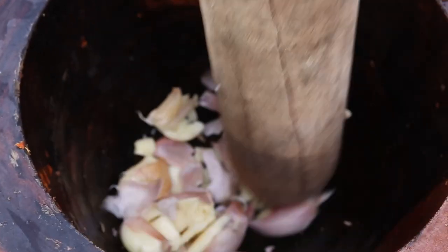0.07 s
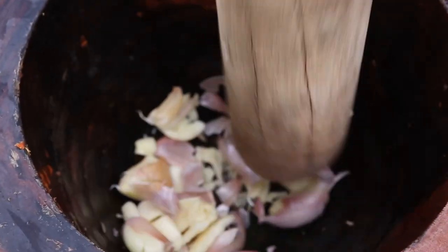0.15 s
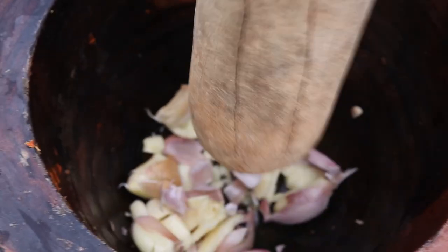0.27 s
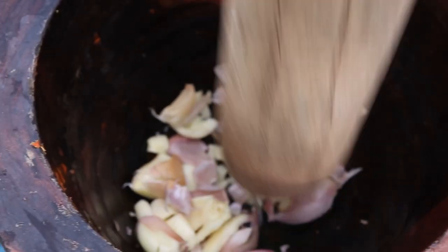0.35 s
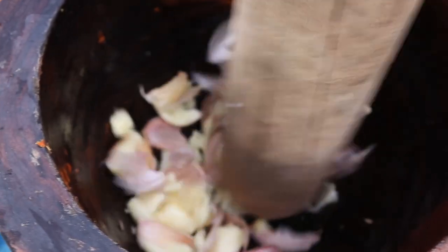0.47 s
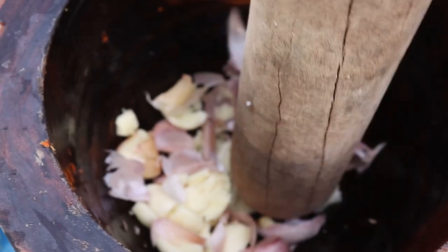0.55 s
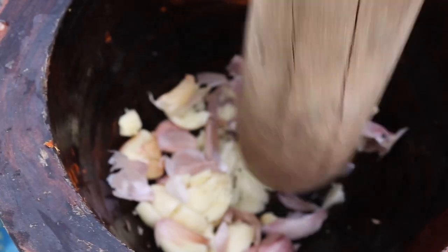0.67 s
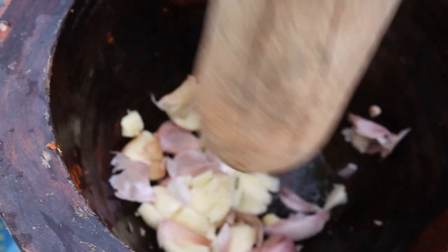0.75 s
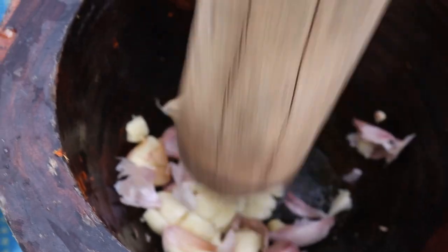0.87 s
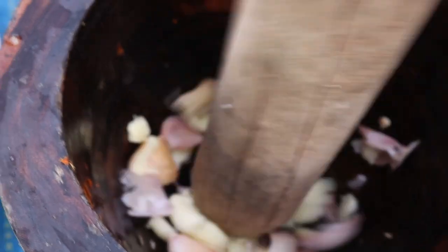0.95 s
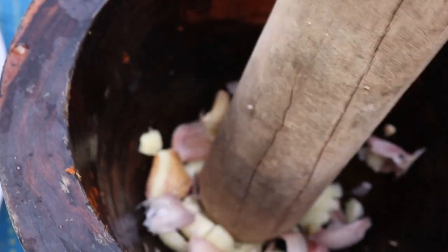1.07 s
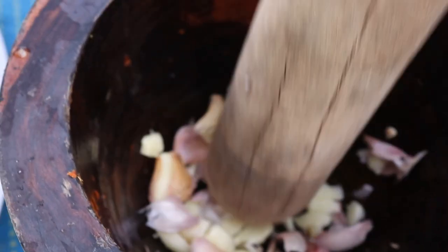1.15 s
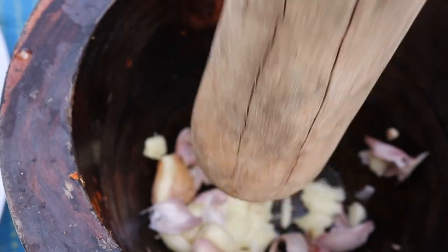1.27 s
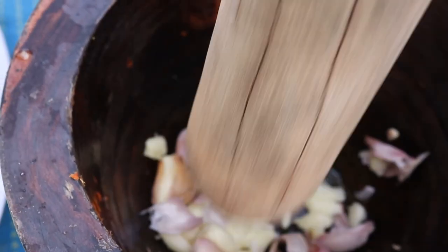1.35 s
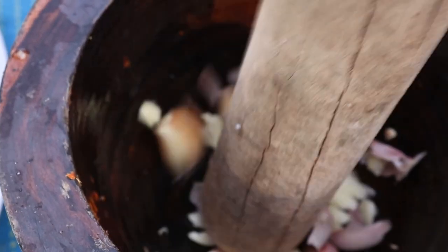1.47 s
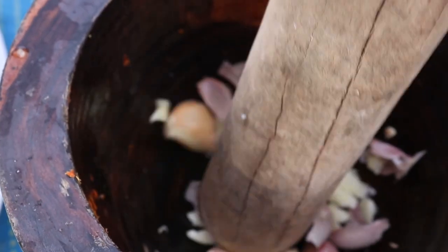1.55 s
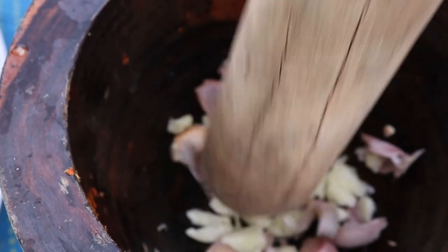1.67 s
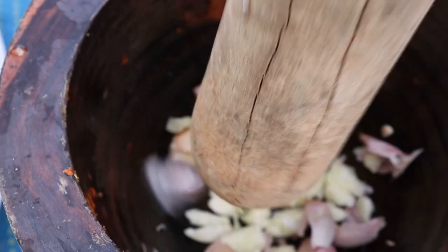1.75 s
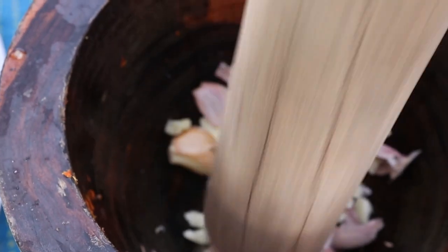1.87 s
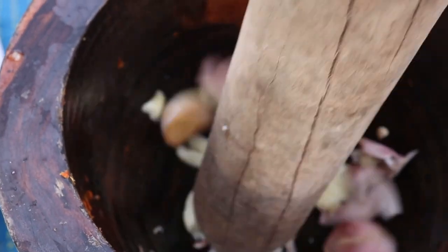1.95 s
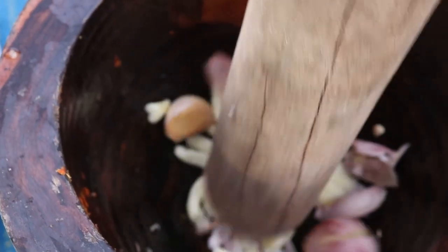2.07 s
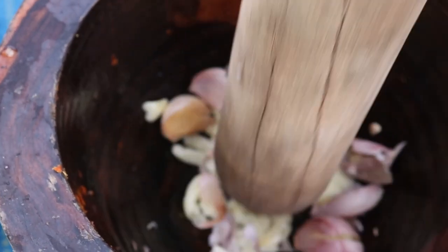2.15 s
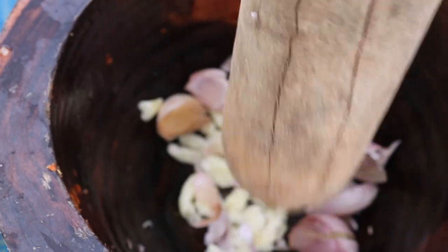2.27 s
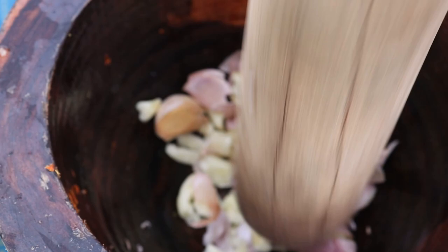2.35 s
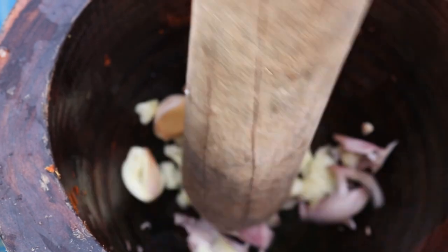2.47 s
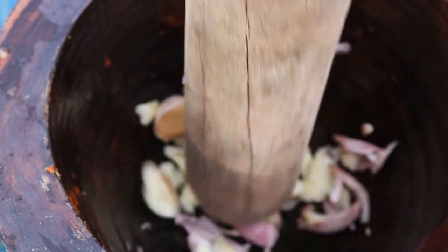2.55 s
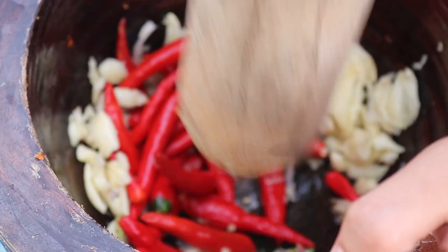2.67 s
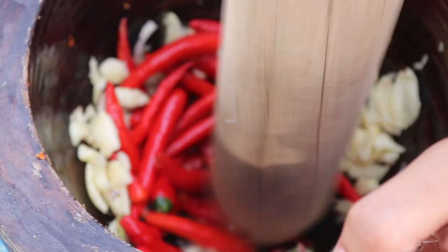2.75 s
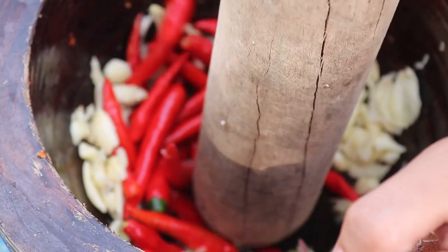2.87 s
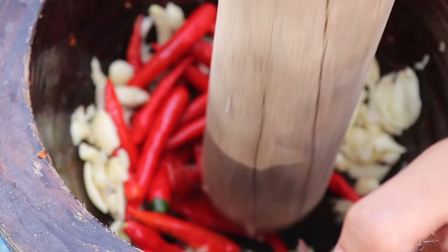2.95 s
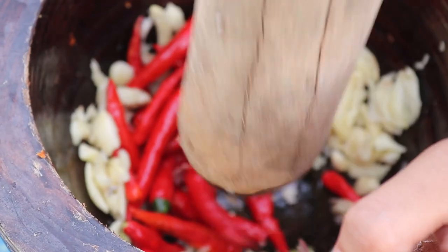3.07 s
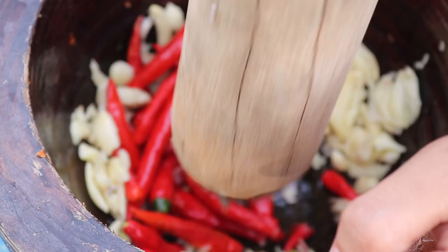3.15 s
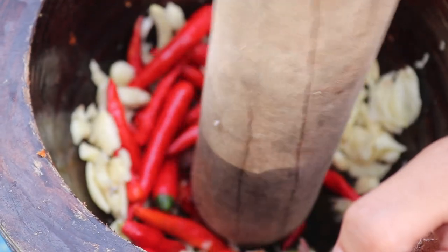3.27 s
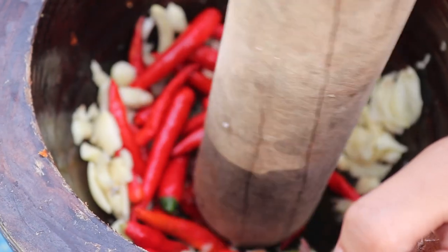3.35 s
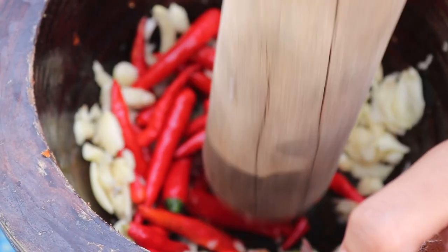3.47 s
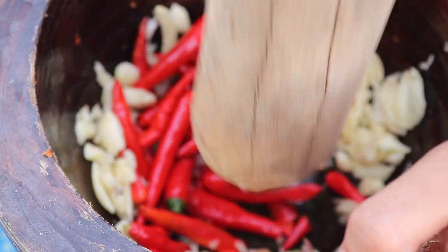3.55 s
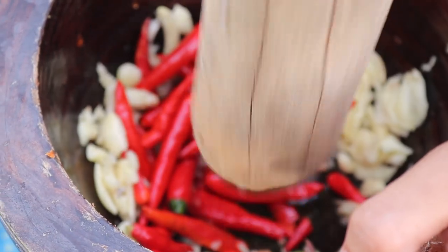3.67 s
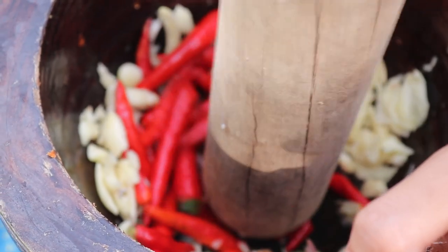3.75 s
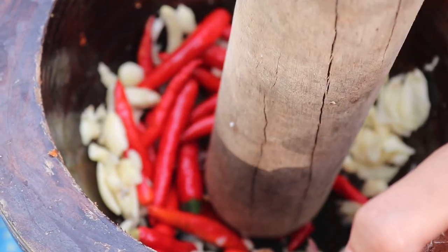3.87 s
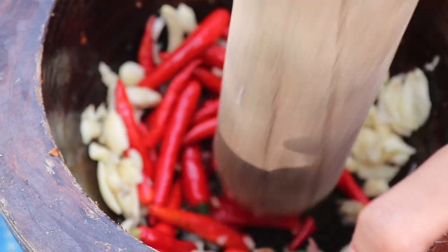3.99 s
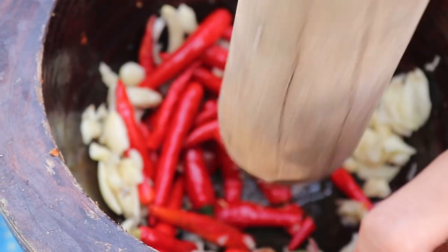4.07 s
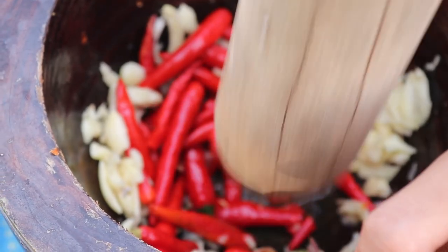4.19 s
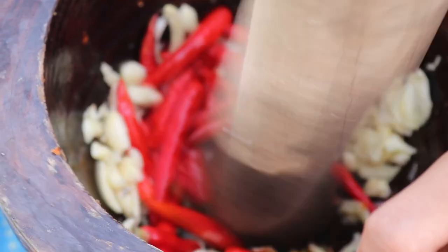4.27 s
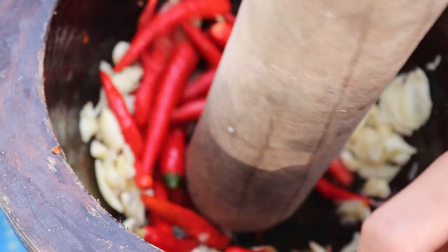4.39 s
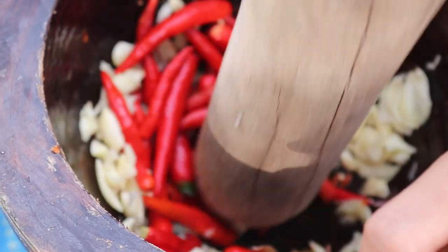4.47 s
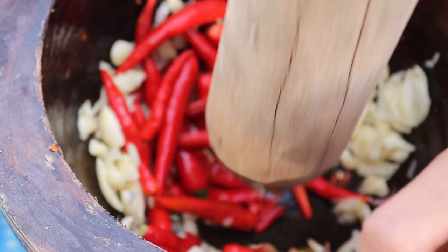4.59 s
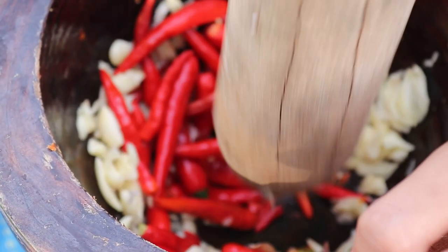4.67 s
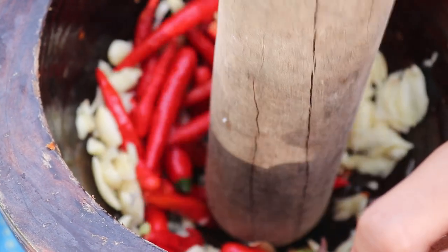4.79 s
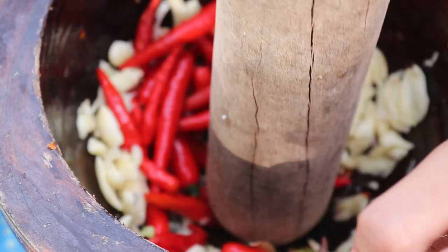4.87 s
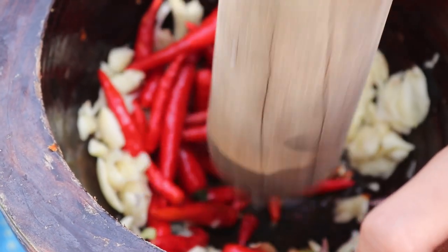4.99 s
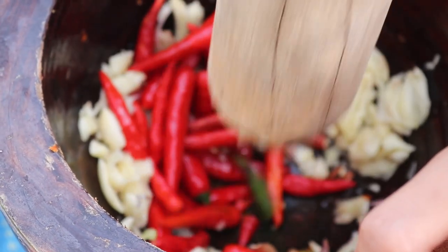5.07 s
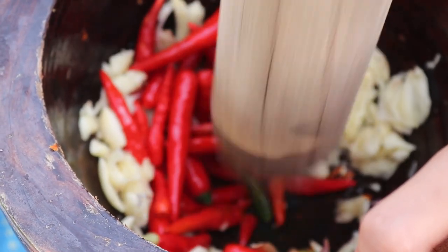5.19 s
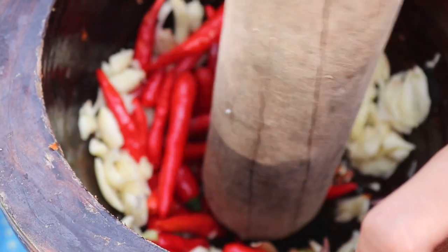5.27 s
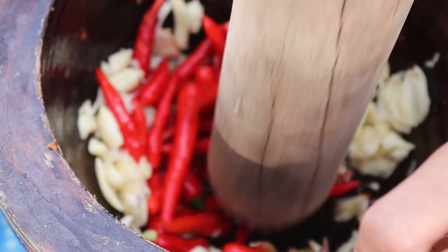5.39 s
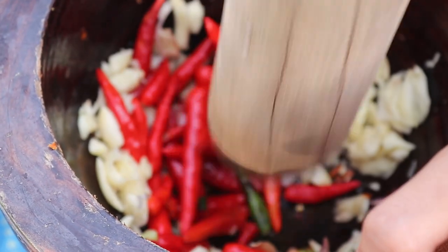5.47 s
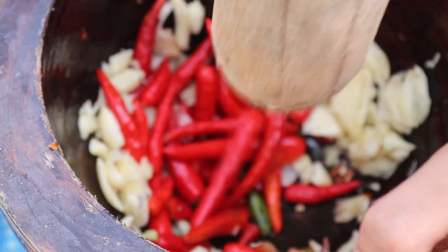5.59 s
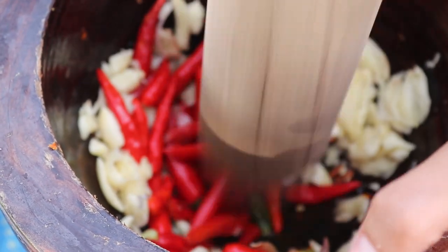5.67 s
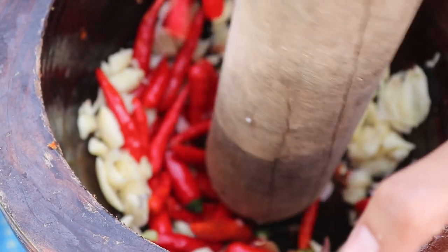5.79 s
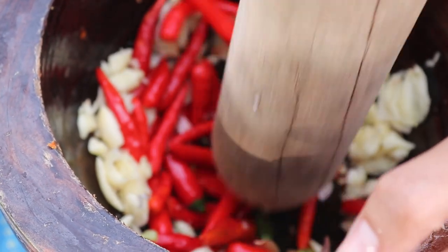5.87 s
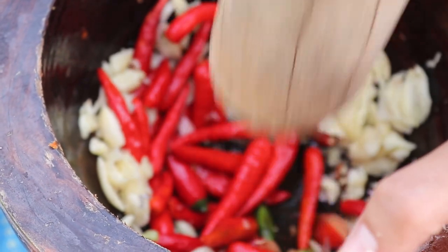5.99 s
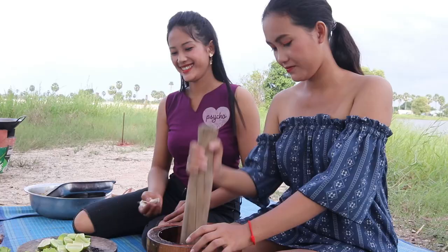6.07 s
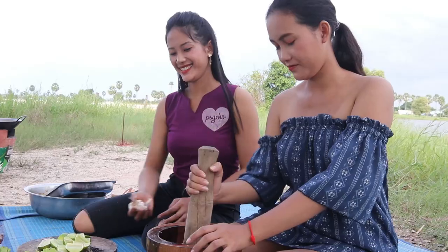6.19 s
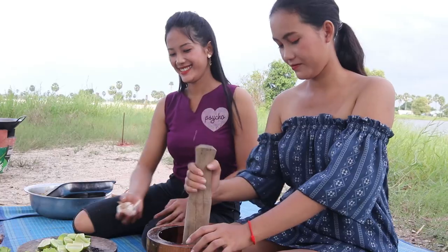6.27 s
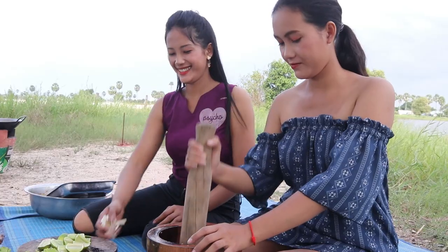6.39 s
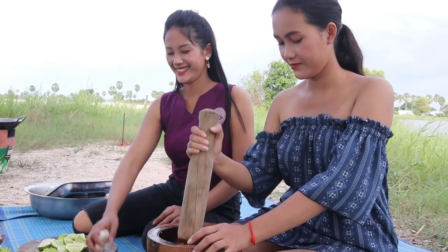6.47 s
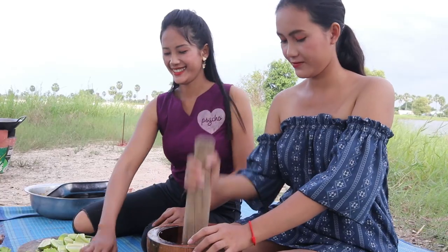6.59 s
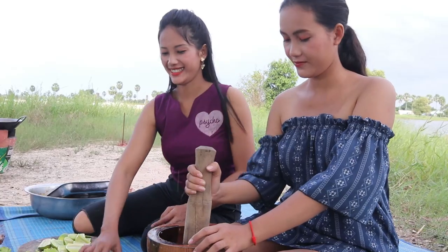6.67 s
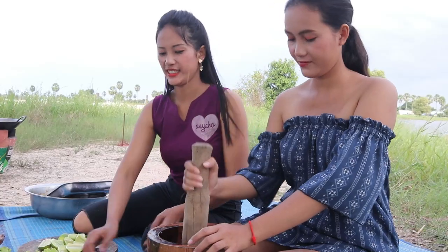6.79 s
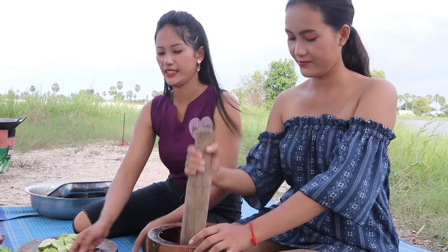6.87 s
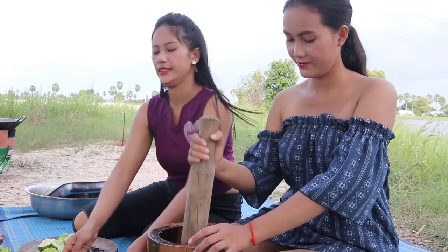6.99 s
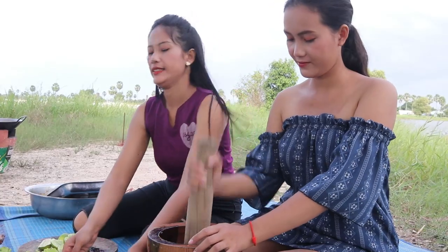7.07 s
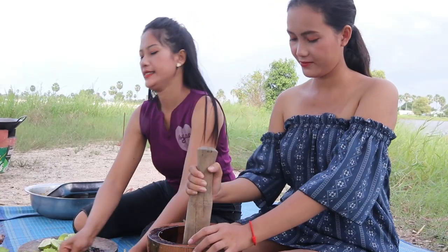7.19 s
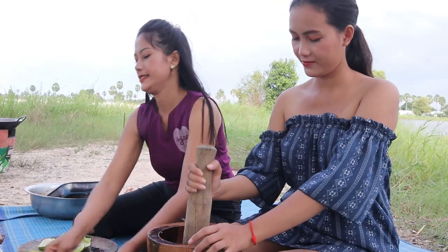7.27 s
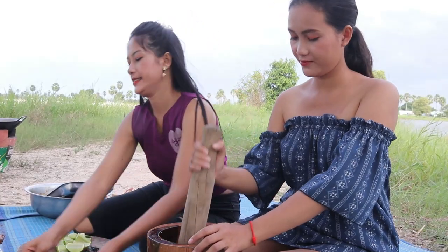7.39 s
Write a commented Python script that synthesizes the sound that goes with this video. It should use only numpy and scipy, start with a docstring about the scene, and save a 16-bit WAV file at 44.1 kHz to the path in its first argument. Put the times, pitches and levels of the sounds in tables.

```python
"""Outdoors, in hiss and wind that buffets the microphone, a wooden pestle pounds garlic in a wooden
mortar, two blows a second. Each blow crunches through the food and, where it gets through, knocks the
hollow bowl; the hardest knocks overload. Pulp fizzes, skins rustle and snap between blows, and a thin
squeak passes near 2 s. From 2.66 s the food is chillies and the hiss changes colour. It changes again
at 6.11 s, and the last three blows are further off."""
import sys
import numpy as np
from scipy import signal
from scipy.fft import rfft, irfft, next_fast_len
from scipy.io import wavfile

SR = 44100
rng = np.random.default_rng(int(sys.argv[2]) if len(sys.argv) > 2 else 0)


def waveform_to_disk(signal):
    """Save audio, clipped to [-1, 1], as 16-bit WAV at the path in sys.argv[1]."""
    frames = np.transpose(np.atleast_2d(signal))
    scaled = np.clip(frames, -1, 1) * 32767
    samples = np.round(scaled).astype(np.int16)
    wavfile.write(sys.argv[1], SR, samples)


N = 327677
TIME = np.arange(N) / SR
CHILLI_FROM_S, FAR_FROM_S = 2.66, 6.11

# food bursting under the pestle: (peak time [s], level [dB], sink-in [s], die-away [s],
# tilt [dB/octave], pocket resonance [Hz], its lift [dB], fizz afterwards [dB])
CRUNCHES = [ (0.211, -27, .006, .006, 5, 4230, 14, -48), (0.5076, -5, 0.0125, 0.0039, 5, 4730, 3.5, -22),
            (1.032, -15, .019, 0.014, 4.5, 2830, 6.5, -30.5),
            (1.534, -12, 0.019, 0.007, 5.5, 3400, 2, -23.5),
            (2.006, -10.5, 0.019, 0.0054, 3.5, 4070, 5, -26.5),
            (2.4834, -15, 0.0014, 0.0042, 5.5, 1510, 15, -45),
            (2.4886, -11, 0.0025, 0.0046, 4.5, 4600, 8, -25), (2.8646, -7, 0.0085, 0.0045, 1, 1980, 9, -54),
            (3.351, -12, 0.0069, 0.0092, 0, 4900, 0.5, -39), (3.8587, 0, 0.0081, 0.002, 1, 2620, 9, -56),
            (4.372, 1, 0.0057, 0.0022, 1.5, 1580, -16, -55),
            (4.857, -1.5, 0.0064, 0.0039, 2, 1920, 12, -50), (5.332, -5, .014, 0.0032, 0, 2690, 4.5, -26.5),
            (5.797, -10, .014, 0.0072, 2.5, 4930, 5, -43), (5.814, -15, 0.0021, 0.0094, 4.5, 4670, 8, -45),
            (6.234, -11, 0.0015, 0.003, 0.5, 1410, 13.5, -32),
            (6.7243, -8.5, 0.0027, 0.0026, 0, 2040, 12.5, -27.5),
            (7.207, -10.5, 0.0022, 0.0034, 5.5, 1272, 32, -45)]


def amp(db):
    """Decibels to gain."""
    return 10 ** (np.asarray(db) / 20)


def unit(x):
    """Scales to rms 1."""
    return x / np.sqrt(np.mean(x ** 2) + 1e-20)


def eq_db(points, hz):
    """Reads an EQ curve on a log-frequency axis."""
    f, db = np.transpose(points)
    return np.interp(np.log(hz + 1), np.log(f + 1), db)


def fader(rows):
    """A level curve as gain per sample."""
    s, db = np.transpose(rows)
    return amp(np.interp(TIME, s, db))


def add(mix, s, sound):
    """Mixes a sound in at its time."""
    start = round(s * SR)
    sound = sound[max(-start, 0):]
    part = mix[max(start, 0):][:len(sound)]
    part += sound[:len(part)]


def colour(x, db_of):
    """Filters by a rule that gives dB for each frequency; rms 1."""
    size = next_fast_len(len(x), True)
    gain = amp(db_of(np.fft.rfftfreq(size, 1 / SR)))
    return unit(irfft(rfft(x, size) * gain, size)[:len(x)])


def noise(size, db_of):
    """Coloured noise of rms 1."""
    return colour(rng.standard_normal(size), db_of)


def hump(hz, centre, width):
    """A resonance curve of height 1."""
    return 1 / (1 + (2 * (hz - centre) / width) ** 2)


def wander(size, rate_hz):
    """Smooth random modulation of rms 1."""
    return noise(size, lambda hz: -np.minimum((hz / rate_hz) ** 2, 100))


def cracks(size, per_s, spread_db):
    """A random train of tiny fractures, most weak and a few strong."""
    sizes = amp(spread_db * np.minimum(rng.exponential(1, size), 4)) * rng.choice([-1, 1], size)
    return unit(sizes * (rng.random(size) < per_s / SR))


def flecks(per_s, low_hz, high_hz, spread_db, cycles, pitches=24):
    """A cloud of tiny soft ticks of many pitches; rms 1."""
    out = np.zeros(N)
    for hz in np.geomspace(low_hz, high_hz, pitches):
        progress = np.linspace(0, 1, int(cycles * SR / hz) + 3)
        fleck = np.sin(np.pi * progress ** .5) ** 2 * np.sin(2 * np.pi * cycles * progress)
        for at, weight, side in rng.random((int(per_s * N / SR / pitches), 3)):
            strength = amp(spread_db * min(-np.log(weight), 2))
            add(out, at * N / SR, np.sign(side - .5) * strength * fleck)
    return unit(out)


def air(flutter_db=1.8, swell_db=1.34):
    """A bed of outdoor hiss, flecked with faint ticks; it switches colour twice."""
    # hiss EQ behind the garlic, the chillies and the far blows: (frequency [Hz], gain [dB])
    garlic_eq = [(150, 2), (250, -28), (282, -1), (348, 0), (421, -4.5), (492, -7.5), (748, -4.5),
                 (905, -9), (1170, -10.5), (1550, -12), (3280, -15.5), (4040, -12.5), (15900, -33)]
    chilli_eq = [(150, 1), (250, -2.5), (366, -1), (547, -12), (761, -6.5), (905, -14), (1040, -7),
                 (1610, -10), (2240, -5.5), (2400, -6.5), (3160, -9.5), (6020, -12), (7420, -23),
                 (15100, -37), (15900, -57)]
    far_eq = [(150, -32), (250, -2.5), (292, -3), (393, -14.5), (451, -5), (788, -15.5), (1350, -11),
              (2240, -10), (2440, -5.5), (5150, -15), (5820, -16), (6570, -24), (7160, -24), (9300, -30),
              (15900, -39.5)]
    # fader ride on the hiss from the chillies on: (time [s], level [dB])
    ride = [(2.7, -35.5), (2.95, -40.5), (3.45, -37.5), (3.85, -40), (4.25, -41), (4.45, -42.5),
            (4.65, -40.5), (5.3, -38), (6.1, -39.5), (7.4, -38.5)]
    garlic, chilli, far = (noise(N, lambda hz: eq_db(eq, hz)) for eq in (garlic_eq, chilli_eq, far_eq))
    sparse = flecks(per_s=150, low_hz=1900, high_hz=5200, spread_db=5.5, cycles=7)
    dense = flecks(per_s=600, low_hz=1600, high_hz=5800, spread_db=5, cycles=15)
    dense = amp(-3.5) * colour(dense, lambda hz: .5 * eq_db(chilli_eq, hz))
    first = amp(-44.5) * garlic + amp(-48.5) * sparse
    later = np.where(TIME < FAR_FROM_S, amp(0.5) * chilli + dense, amp(0.5) * far + .2 * dense)
    flutter = amp(flutter_db * wander(N, rate_hz=70) + swell_db * wander(N, rate_hz=12))
    return flutter * np.where(TIME < CHILLI_FROM_S, first, later * fader(ride))


def wind():
    """Lumpy eddies on the microphone, riding on the slow rise and fall of the breeze."""
    # rumble of the eddies: (frequency [Hz], gain [dB])
    rumble_eq = [(11, -31), (18, 0.5), (30, -1), (113, -13), (161, -16.5), (292, -27), (403, -35),
                 (435, -34), (601, -47), (700, -48), (910, -59), (1540, -120)]
    # strength of the breeze: (time [s], level [dB])
    breeze = [(0, -41.5), (.34, -21.5), (.62, -34.5), (.77, -22.5), (.92, -30), (1.6, -29.5), (2.13, -29.5),
              (2.35, -36.5), (2.62, -29), (3.0, -36.5), (4.55, -40), (5.55, -35), (5.75, -27.5),
              (5.98, -37.5), (6.28, -23.5), (6.66, -17), (6.82, -28), (7.43, -25.5)]
    eddies = noise(N, lambda hz: eq_db(rumble_eq, hz))
    lumps = amp(2.8 * wander(N, rate_hz=6))
    return fader(breeze) * unit(eddies * lumps)


def hollow_tones():
    """Narrow bands of noise fade in and out, faint and distant."""
    # hollow tones: (time [s], length [s], centre [Hz], width [Hz], level [dB])
    tones = [(1.402, 0.065, 650, 314, -33.5), (1.423, 0.11, 830, 170, -41.5), (1.575, 0.21, 740, 120, -38),
             (6.756, 0.097, 1120, 170, -35)]
    out = np.zeros(N)
    for s, length, centre_hz, width, db in tones:
        size = int(length * SR)
        tone = noise(size, lambda hz: 12 * np.log10(hump(hz, centre_hz, width)))
        add(out, s, amp(db) * tone * signal.windows.tukey(size, .7))
    return out


def squeak():
    """One thin squeak, roughened by jitter in its pitch and level."""
    # path of the squeak: (time [s], pitch [Hz], level [dB])
    path = [(1.823, 1477, -47), (1.86, 1450, -27.5), (1.895, 1465, -30.5), (1.915, 1447, -45),
            (1.94, 1460, -41), (1.998, 1476, -47), (2.12, 1526, -43), (2.17, 1520, -54)]
    # its timbre: (multiple of the pitch, relative level [dB])
    partials = [(1, 6), (1.7, 7), (1.92, 12.5), (2.2, 1), (2.76, 13.5), (2.9, 3), (4, 10), (5.06, -2),
                (6.3, -9), (7, -20), (7.6, -18), (8.4, -17), (9, -14)]
    s, pitch_hz, db = np.transpose(path)
    out, t = np.zeros(N), np.arange(s[0], s[-1], 1 / SR)
    jitter = .011 * wander(len(t), rate_hz=400)
    phase = 2 * np.pi * np.cumsum(np.interp(t, s, pitch_hz) * (1 + jitter)) / SR
    tone = sum(amp(part_db + 1.8 * wander(len(t), rate_hz=63)) * np.sin(k * phase)
               for k, part_db in partials)
    stutter = amp(3.5 * wander(len(t), rate_hz=60))
    add(out, s[0], amp(np.interp(t, s, db)) * unit(tone * stutter))
    return out


def rustle(sizzle_db=6, fizz_rise_s=0.0086, fizz_fade_s=0.029, swell_share=0.38):
    """Dry skins and wet pulp crackle: a fizz after each blow, a swell where the pestle drags them."""
    # colour of the skins: (frequency [Hz], gain [dB])
    skin_eq = [(590, -25), (1000, -31), (1320, -3.5), (2050, -5.5), (4300, -4.5), (6610, -11.5),
               (7770, -18), (8830, -16), (12800, -30), (15900, -34)]
    # the pestle drags skins off the pulp: (peak time [s], level [dB], length [s])
    drags = [(0.005, -34, 0.018), (0.055, -38.5, 0.049), (0.182, -39.5, 0.064), (0.264, -41, 0.047),
             (0.699, -36.5, 0.057), (0.962, -36.5, 0.075), (1.16, -45.5, 0.14), (1.428, -42.5, 0.083),
             (1.687, -42, 0.15), (1.874, -36.5, 0.049), (2.167, -36.5, 0.093), (2.513, -28.5, 0.021),
             (2.692, -40, 0.064), (3.425, -51, 0.064), (7.377, -34.5, 0.11)]
    crackle = cracks(N, per_s=5500, spread_db=5) + .5 * cracks(N, per_s=450, spread_db=4)
    grain = colour(crackle, lambda hz: eq_db(skin_eq, hz) + sizzle_db * hump(hz, 11100, 3720))
    stir, t = np.zeros(N), np.arange(SR // 3) / SR
    for s, *_, fizz_db in CRUNCHES:
        add(stir, s, amp(fizz_db) * np.minimum(t / fizz_rise_s, 1) * np.exp(-t / fizz_fade_s))
    t = np.arange(-SR // 3, SR // 3) / SR
    for s, db, length in drags:
        slope_s = length * np.where(t < 0, swell_share, 1 - swell_share)
        add(stir, s + t[0], amp(db) * np.exp(-(t / slope_s) ** 2))
    return grain * stir


def ticks(body_trim_db=-7, edge_trim_db=3, body_decay_s=0.0035, edge_decay_s=0.00092):
    """Bits of skin and pulp snap or drop: a short band of noise and, in dry skins, a crisp edge."""
    # single snaps: (time [s], body before trim [dB], centre [Hz], edge before trim [dB])
    snaps = [(0.198, -17.5, 4480, -22), (0.2077, -17, 3900, -28), (0.263, -29, 2960, -31),
             (0.286, -25, 2970, -29.5), (0.409, -19.5, 2840, -45), (0.849, -27.5, 4200, -54),
             (1.0303, 0, 3100, -24), (1.2089, -24, 3680, -35), (1.2266, -24, 3120, -35),
             (1.251, -26, 2800, -33.5), (1.273, -31, 3060, -31), (1.6296, -19, 2480, -55),
             (1.711, -17.5, 4900, -42), (2.078, -26, 2776, -32.5), (2.4425, -25.5, 1660, -56),
             (2.5596, -11, 3570, -25.5), (3.243, -18.5, 2270, -56), (3.5513, -17, 2250, -54),
             (4.5842, -20, 1930, -60), (7.01, -18, 1800, -28)]
    out, t = np.zeros(N), np.arange(SR // 40) / SR
    for s, body_db, centre_hz, edge_db in snaps:
        body = noise(len(t), lambda hz: 22 * np.log10(hump(hz, centre_hz, 0.48 * centre_hz)))
        edge = noise(len(t), lambda hz: 30 * np.log10(hump(hz, 7200, 9000)))
        attack = np.minimum(t * centre_hz / 2, 1)  # swells over two cycles
        decay = np.exp(-t / body_decay_s) + 0.066 * np.exp(-t / 0.015)
        add(out, s, amp(body_db + body_trim_db) * body * attack * decay)
        add(out, s, amp(edge_db + edge_trim_db) * edge * np.exp(-t / edge_decay_s))
    return out


def bumps():
    """The heavy mortar thuds and rocks on soft ground."""
    # modes of its foot: (frequency [Hz], relative level [dB], t60 [s])
    foot = [(239, -1.5, 0.062), (337, -2.5, 0.04), (455, -1.5, 0.028)]
    # dull bumps: (time [s], rocking level [dB], frequency [Hz], swell [s], foot thud [dB])
    hits = [(0.973, -11.5, 169.6, 0.013, -41), (2.862, -18, 95, 0.0048, -30), (3.35, -24, 94, .01, -24),
            (3.852, -17, 107, 0.0032, -37), (5.792, -24.5, 94, 0.0093, -31),
            (6.235, -25, 157.5, 0.015, -13), (6.724, -20, 151, 0.012, -16.5), (7.207, -27, 149, 0.014, -15)]
    out, t = np.zeros(N), np.arange(SR // 5) / SR
    thud = sum(amp(db - 60 * t / t60) * np.sin(2 * np.pi * hz * t) for hz, db, t60 in foot)
    for s, db, hz, swell, thud_db in hits:
        rock = t / swell * np.exp(1 - t / swell) * np.sin(2 * np.pi * hz * t)
        add(out, s, amp(db) * rock + amp(thud_db) * thud)
    return out


def pestle(bending_hz=1645, t60_s=0.06):
    """The loosely held shaft sings briefly in its bending mode after some blows."""
    # rings of the shaft: (time [s], level [dB])
    rings = [(1.536, -19), (2.001, -22), (2.4831, -13), (2.509, -23), (2.8658, -19), (3.86, -24),
             (4.3704, -10), (7.206, -20)]
    out, t = np.zeros(N), np.arange(SR // 6) / SR
    ring = amp(-60 * t / t60_s) * np.sin(2 * np.pi * bending_hz * t)
    for s, db in rings:
        add(out, s, amp(db) * ring)
    return out


def knocks(attack_s=0.0023):
    """The blunt end strikes the bowl; food left between them damps the ring."""
    # modes of mortar and pestle, the bowl's after-ring last:
    # (base frequency [Hz], relative level [dB], base t60 [s])
    wood = [(470, -25, 0.0099), (612, 1.5, 0.014), (618, 7.5, 0.027), (764, -7.5, 0.018), (865, -56, 0.005),
            (1288, -9.5, 0.03), (1526, -15.5, 0.043), (1781, -8, 0.027), (2500, -22, 0.033),
            (637, -20, 0.12)]
    # wood meets wood: (time [s], level [dB], pitch factor, ring-time factor, tilt [dB/octave],
    # frequency favoured by the spot struck [Hz], its lift [dB])
    strikes = [ (0, -29.5, 1.01, 2.6, -13, 1600, -2), (.0572, -9.5, .87, 0.56, -12, 895, -9),
               (.5158, 11, 1.01, 0.44, -4, 900, -2), (.5842, 6, 0.97, 0.4, -2.5, 1900, 4.5),
               (2.8652, 10, 1.01, 0.73, 2, 1570, 2), (3.3415, -12.5, 1.04, 0.55, -6, 800, -8),
               (3.853, -24, 1.1, 0.36, -10, 800, 12), (4.3724, 8, 1.01, 0.62, -1.5, 1600, 14),
               (4.8563, 10, 1.017, .85, 3, 1250, -2.5), (5.3175, -14, 1.1, 0.24, 17.5, 1300, 6),
               (5.3305, -19, 1.055, 1.45, -8, 1300, -9), (5.784, -21, 1.06, 1.5, 13.5, 800, -4),
               (6.2345, -22.5, .82, 2.3, 8, 1330, -10), (6.7245, -17.5, 0.99, 1.2, 0, 1800, 13),
               (7.2055, -21, 1.064, 0.77, 16.5, 855, 26.5)]
    out, t = np.zeros(N), np.arange(SR // 6) / SR
    for s, db, pitch, ring, tilt_db, spot_hz, lift_db in strikes:
        for hz, mode_db, t60 in wood:
            tone_db = tilt_db * np.log2(hz / 628) + lift_db * hump(hz, spot_hz, .5 * spot_hz)
            decay = amp(db + mode_db + tone_db - 60 * t / (t60 * ring))
            mode = decay * np.sin(2 * np.pi * hz * pitch * t)
            add(out, s, mode * (1 - np.exp(-t / attack_s)))
    return out


def crunches(touch_share=0.24, jerk_db=3.5):
    """Cells burst from first touch, harder as the pestle sinks; the pocket under it colours them."""
    # crunch colour of each food: (frequency [Hz], gain [dB])
    garlic_eq = [(120, -36), (200, -11), (394, 3), (708, 6), (1040, -4), (1610, 4.5), (2460, 1), (2900, 1),
                 (4500, -1), (5820, -5.5), (6500, -10.5), (8090, -7.5), (10800, -14), (15900, -30)]
    chilli_eq = [(120, -56), (200, -13.5), (366, -13), (658, -4.5), (1120, -10.5), (1940, -4), (2240, -8.5),
                 (2650, -5), (3750, -6), (5030, -11), (6260, -16.5), (7800, -15), (12300, -28.5),
                 (15900, -45)]
    out, t = np.zeros(N), np.arange(-1500, 4500) / SR  # zero at the peak
    for s, db, sink, fall, tilt_db, pocket_hz, lift_db, _ in CRUNCHES:
        food_eq = garlic_eq if s < CHILLI_FROM_S else chilli_eq
        bursts = cracks(len(t), per_s=9000, spread_db=0.5)
        grain = colour(bursts, lambda hz: eq_db(food_eq, hz) + tilt_db * np.log2((hz + 300) / 3000)
                       + lift_db * hump(hz, pocket_hz, 0.17 * pocket_hz))
        depth = np.clip(1 + t / sink, 0, 1)
        build = touch_share * depth ** 0.18 + (1 - touch_share) * depth ** 3
        press = np.where(t < 0, build, np.exp(-(t / fall) ** 2))
        jerks = unit(amp(jerk_db * wander(len(t), rate_hz=280)))  # the food gives way unevenly
        # pulp creaks before the peak and fizzes after
        settle = amp(-30.5) * np.exp(-abs(t) / np.where(t < 0, .009, .018))
        add(out, s + t[0], amp(db) * grain * (press * jerks + settle))
    return out


def scene():
    """The pounding over its open-air bed, in mono."""
    pounding = crunches() + knocks() + pestle() + bumps() + ticks() + rustle()
    return (pounding + air() + wind() + hollow_tones() + squeak())[None]


def record(dry, threshold_db=-4, deepest_db=10, recover_db_per_s=80, attack_s=0.018, top_hz=16000):
    """The microphone has a notch; a slow limiter ducks after hard knocks, whose first cycles clip."""
    size = 2 * next_fast_len(N, True)
    notch = amp(-7 * hump(np.fft.rfftfreq(size, 1 / SR), centre=6510, width=330))
    x = irfft(rfft(dry[0], size) * notch)[:N]
    over_db = np.clip(20 * np.log10(abs(x) + 1e-9) - threshold_db, 0, deepest_db)
    held_db = np.maximum.accumulate(over_db + recover_db_per_s * TIME) - recover_db_per_s * TIME
    pole = np.exp(-1 / (attack_s * SR))
    duck_db = signal.lfilter([1 - pole], [1, -pole], held_db)
    clipped = np.clip(x * amp(-duck_db), -1, 1)
    low_pass = signal.firwin(255, top_hz, window=("kaiser", 7), fs=SR)
    return signal.oaconvolve(clipped, low_pass, "same")[None]


dry = scene()
out = record(dry)
waveform_to_disk(out)
```